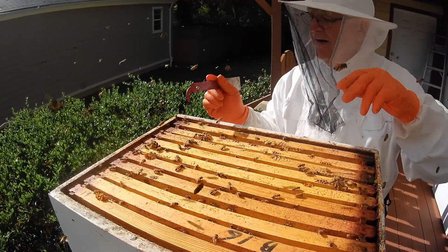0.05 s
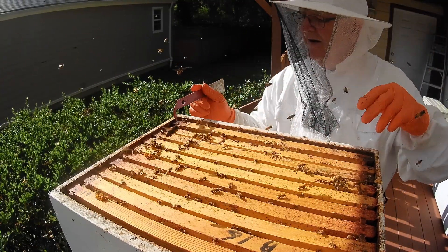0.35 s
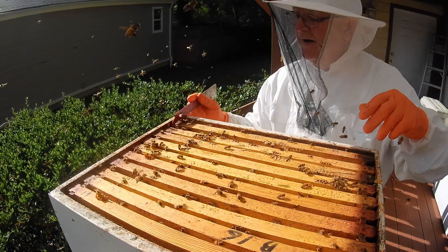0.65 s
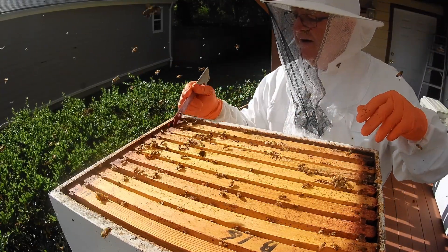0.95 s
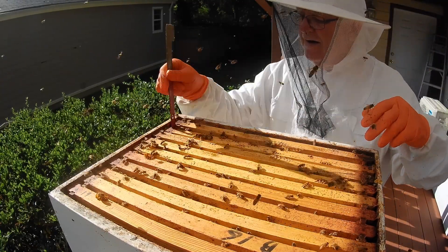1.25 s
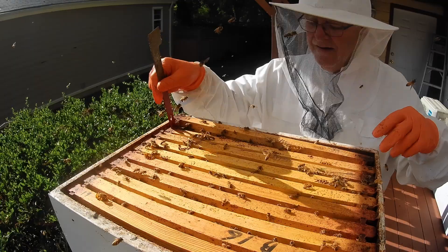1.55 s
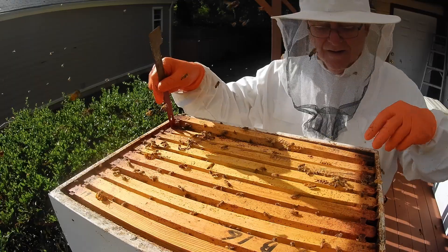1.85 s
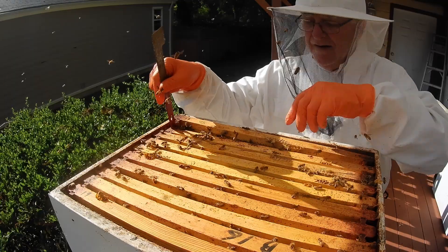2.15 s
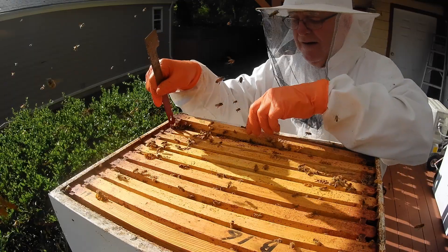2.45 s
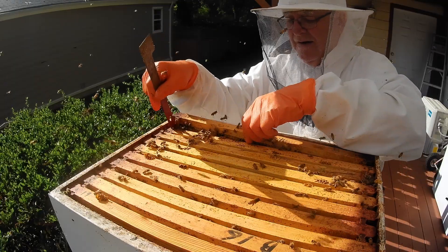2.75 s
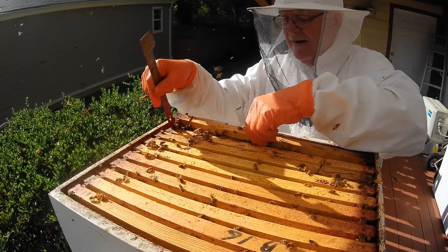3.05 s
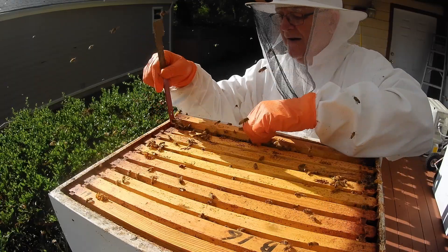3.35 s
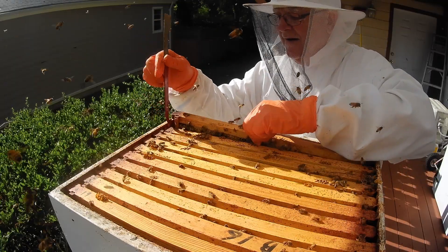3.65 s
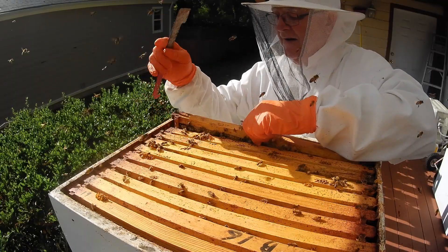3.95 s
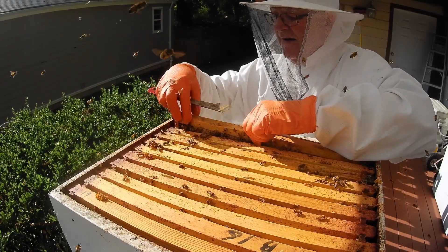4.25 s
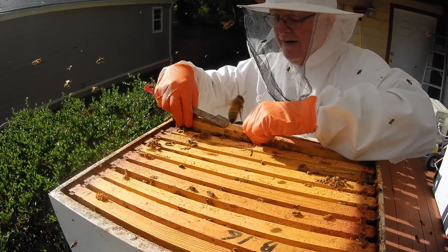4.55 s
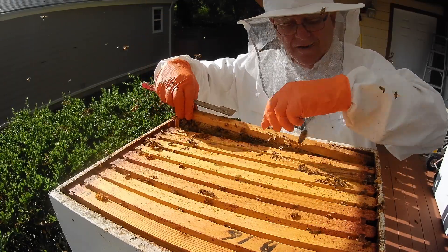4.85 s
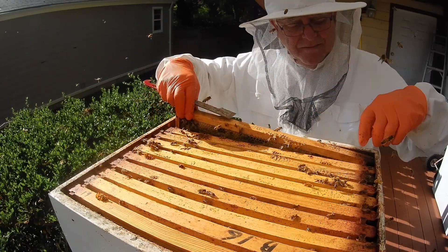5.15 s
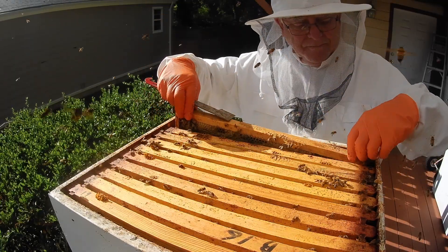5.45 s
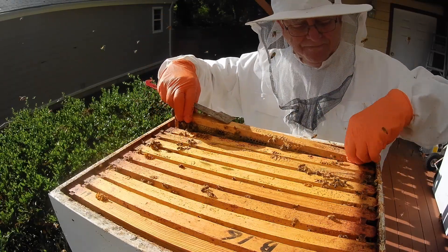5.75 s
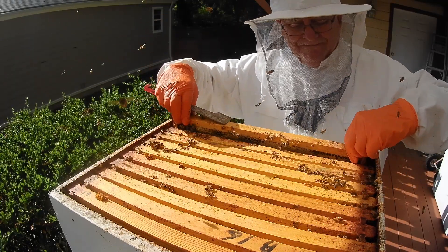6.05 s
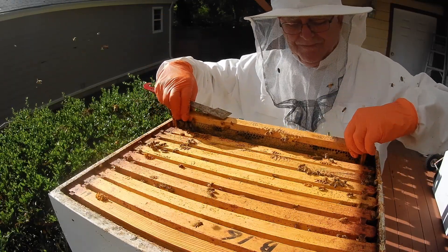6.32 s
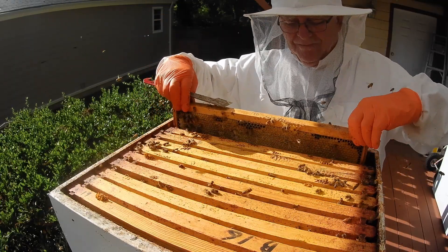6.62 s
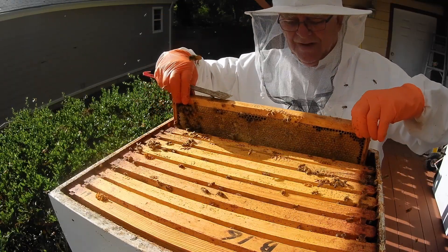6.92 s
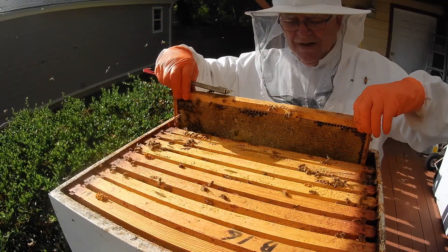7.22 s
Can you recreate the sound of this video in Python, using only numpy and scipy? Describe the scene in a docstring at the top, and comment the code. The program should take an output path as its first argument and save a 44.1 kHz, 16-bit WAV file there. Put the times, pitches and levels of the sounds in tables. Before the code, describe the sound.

Outdoors, close to an open beehive, many bees blend into a continuous wavering hum. Individual bees swoop in with brief whining buzzes, some bumping the microphone with small clicks and dull thuds. The passes pause while a steel tool makes a few quiet scrapes in the wooden box. Then comes the loudest sound, a hard tap of a bee striking the microphone, followed by more fly-bys. A very faint cricket chirps far off.

```python
"""Honey bees at an open hive

Periodic wing strokes give each bee a harmonic hum, and many detuned bees blur into a swarm. Some fly
up to the microphone, fan it with their wings and bump into its case, exciting its modes. A steel hive
tool ticks faintly by friction as a wooden frame is eased out. Far off, a cricket chirps and a machine
drones in the garden air."""
import sys
import numpy as np
from scipy import signal
from scipy.fft import rfft, irfft
from scipy.io import wavfile
from scipy.ndimage import map_coordinates

SR = 44100
rng = np.random.default_rng(int(sys.argv[2]) if len(sys.argv) > 2 else 0)


def wrap_up_sound(samples):
    """Save the sound to the file named by the first command line argument, as 16-bit audio."""
    columns = np.atleast_2d(samples).T
    # keep every value between -1 and 1, then stretch to whole-number steps
    tamed = np.clip(columns, -1, 1)
    steps = np.round(tamed * 32767).astype(np.int16)
    wavfile.write(sys.argv[1], SR, steps)


N = 325458
T = np.arange(N) / SR
FADE_S = .09  # a close bee is heard this long before and after its path


def close_bee(path, facing_db, octave_trim_db, buzz_trim_db, tilt_db, whine_db):
    """Periodic wing strokes radiate harmonics; the near-field fundamental falls fastest with distance."""
    # harmonic envelope of a close wing (frequency [Hz], relative level [dB])
    wing_spectrum = [(800, 2.5), (1100, -3.5), (1600, -6), (2100, -14.5), (2500, -17.5), (3000, -25.5),
                     (4200, -35), (6000, -50.5), (8600, -43.5), (11000, -73)]
    # air torn by the wing (frequency [Hz], relative spectral density [dB])
    rasp_spectrum = [(400, -10), (900, 15), (1600, 18), (2300, 5), (3800, -2), (5200, -8), (6300, -28),
                     (9000, -33.5), (11000, -47.5)]
    # brief pulsing hisses, the last around the loudest click (time [s], half width [s], level [dB])
    hisses = [(0.48, 0.017, -60), (0.595, 0.013, -65), (1.301, 0.0027, -66), (1.318, 0.026, -64),
              (2.426, 0.0078, -48), (2.448, 0.0078, -58), (2.5057, 0.0012, -41), (5.991, 0.016, -46.5)]
    # colour of that hiss (frequency [Hz], relative spectral density [dB])
    hiss_spectrum = [(1000, -4.5), (2400, 0), (4400, 2), (6000, -4), (9200, -5), (10500, -32.5),
                     (15000, -44.5)]
    arrive_db_per_s, leave_db_per_s, usual_db = 342.5, 315, -36
    jitter, whine_width_hz, rough_hz = .005, 170, 2500
    s, path_hz, path_db, path_whine_hz = np.transpose(path)
    near = (T > s[0] - FADE_S) & (T < s[-1] + FADE_S)
    t = T[near]
    away_db = arrive_db_per_s * np.maximum(s[0] - t, 0) + leave_db_per_s * np.maximum(t - s[-1], 0)
    closer_db = np.interp(t, s, path_db) - away_db - usual_db
    hz, whine_hz = np.interp(t, s, path_hz), np.interp(t, s, path_whine_hz)
    phase = 2 * np.pi * np.cumsum(hz * (1 + jitter * walk(108, t))) / SR
    # the balance of the first two harmonics shows which way the bee faces
    fundamental_db = usual_db + closer_db + facing_db
    octave_db = -38 + .76 * closer_db + octave_trim_db + 3 * walk(36.7, t)
    buzz_db = -42.5 + .72 * closer_db + buzz_trim_db
    octave = undb(octave_db) * np.cos(2 * phase + rng.normal(0, 1))
    hum = np.sqrt(2) * (undb(fundamental_db) * np.cos(phase) + octave)
    buzz = 0
    for k in range(3, 36):
        turning_db = 3 * walk(25.5, t) + 2.2 * walk(170, t)  # slow turns and fast flutter
        # the band beamed at the microphone moves as the bee banks
        beam_db = whine_db * np.exp(-.5 * ((k * hz - whine_hz) / whine_width_hz) ** 2)
        gain = gain_at(k * hz, wing_spectrum) * undb(turning_db + beam_db + tilt_db * np.log2(k))
        smear = (k * hz.mean() / rough_hz) ** 2 * walk(130, t)  # unequal strokes blur high harmonics
        buzz = buzz + gain * np.cos(k * phase + smear + rng.normal(0, 1))
    flicks = rng.standard_normal(len(t)) * np.cos(phase / 2) ** 6  # one noise burst a stroke
    buzz = unit(buzz) + undb(-11) * unit(colour(flicks, rasp_spectrum))
    hiss = unit(colour(flicks, hiss_spectrum)) * swells(hisses)[near]
    stroke_gain = undb(.7 * walk(200.2, t))
    return (hum + undb(buzz_db) * buzz + hiss) * stroke_gain * signal.windows.tukey(len(t), .1)


def fly_bys():
    """Directivity: each bee that comes close has its own tone, set by the way it faces."""
    # one path a flight (time [s], wingbeat [Hz], nearness as a level [dB], whine centre [Hz])
    paths = [
        [(.418, 258.3, -45.5, 1050), (.438, 273.5, -38, 1600), (.472, 250, -39, 900),
         (.506, 261.4, -36.5, 1250), (.542, 250.4, -43.5, 1400), (.576, 263.8, -36, 1580),
         (.62, 272, -36, 1500), (.642, 282.3, -44, 1670), (.66, 291.2, -30, 1290), (.674, 304, -42, 1520),
         (.70, 301, -34.5, 1400), (.72, 271, -48.5, 900)],
        [(1.23, 258.5, -48, 1300), (1.262, 259.2, -39.5, 800), (1.294, 256.3, -24.5, 780),
         (1.318, 275, -26, 810), (1.346, 262.8, -32.5, 850), (1.374, 286.6, -22.5, 1330),
         (1.394, 283.4, -25.5, 1120), (1.424, 258, -29.5, 1060), (1.462, 270, -40, 880)],
        [(2.12, 244.3, -42.5, 1200), (2.158, 232.7, -35.5, 1150), (2.205, 241, -47, 1220)],
        [(2.225, 272.4, -54.5, 1390), (2.254, 292.6, -47.5, 1460), (2.295, 289, -57, 1200),
         (2.335, 297.6, -43, 1780), (2.37, 303, -49.5, 1190), (2.41, 308.8, -36, 920),
         (2.462, 268.4, -41, 1320), (2.494, 272, -45, 1340), (2.508, 274, -33, 820), (2.542, 256, -38.5, 1050),
         (2.574, 289.1, -34.5, 1150), (2.614, 248.5, -28.5, 1240), (2.64, 261.5, -35, 1590),
         (2.68, 289, -28, 1110), (2.712, 267, -30, 1050), (2.74, 277.5, -42, 840)],
        [(5.97, 264.5, -48, 1315), (5.995, 248, -38, 1200), (6.013, 225.6, -40, 730), (6.05, 262, -37.5, 1600),
         (6.085, 274.4, -40, 1394)],
        [(6.125, 235.2, -43, 1200), (6.15, 251.5, -36.5, 1520)],
        [(6.535, 270.2, -49, 1400), (6.574, 272.7, -44, 1410), (6.594, 292.4, -39.5, 1300),
         (6.626, 275, -36.5, 1200), (6.69, 277, -45.5, 820)],
        [(7.01, 249.4, -66, 1005), (7.085, 256.2, -41, 1040), (7.13, 249.2, -54, 1246),
         (7.175, 251.7, -53, 995), (7.26, 258.3, -50, 1300)],
    ]
    # tone offsets a flight (fundamental [dB], octave [dB], buzz [dB], tilt [dB/octave], whine [dB])
    tones = [(1.5, -2.5, 2.5, 2.5, 4.5), (1, -2, 1, 1.5, 6), (-20, -2, -3.5, 4, 14),
             (2.5, 1.5, -.5, 1.5, 9), (0, 0.5, 1, -2, 4), (-25, -3.5, -5, 4, 4), (1, -2, -1.5, 0.5, 8),
             (1, -10, -1.5, 6, 10)]
    out = np.zeros(N)
    for path, tone in zip(paths, tones):
        add(out, path[0][0] - FADE_S, close_bee(path, *tone))
    return out


def head_clicks(rebound_s=.00041, rebound_gain=.13):
    """Hard impacts excite the case's modes according to the place struck; a glancing blow is duller."""
    # modes of the case (frequency [Hz], t60 [s], weight at the face [dB], weight at the rim [dB])
    case_modes = [(1700, 0.0071, 1.5, -37), (2500, 0.0046, -1.5, 12.5), (2990, 0.011, -0.5, -14),
                  (3460, 0.0033, 4, -24), (4070, 0.012, 0, -17), (4400, 0.008, -12, 11.5),
                  (5150, 0.0039, -2.5, -6.5), (6700, 0.0054, -22.5, 11), (8500, 0.003, -13.5, 2),
                  (9600, 0.0018, -16.5, -13), (12100, 0.002, -9.5, -28), (13400, 0.0024, -15.5, -15)]
    # bees hit head first (time [s], peak level [dB], place [0 face to 1 rim], cutoff [Hz])
    impacts = [(0.4302, -17, 0.5, 12000), (0.662, -37, 0.2, 3200), (0.682, -32.5, 0.15, 4050),
               (1.298, -43, .1, 3480), (2.426, -35, 0.28, 9500), (2.5075, -35, 0.3, 10000),
               (5.9853, 1, 0.06, 18000), (5.987, -18, .1, 5000), (5.995, -35, .2, 15000),
               (6.137, -38, .05, 2100), (7.103, -34.5, .3, 9000)]
    out = np.zeros(N)
    hz, t60, face_db, rim_db = np.transpose(case_modes)
    for s, db, place, cutoff_hz in impacts:
        click = ring(hz, t60, face_db + place * (rim_db - face_db))
        t = T[:len(click)]
        second_contact = rebound_gain * np.interp(t - rebound_s, t, click)
        click = lowpass(click + second_contact, cutoff_hz, order=3)
        add(out, s, undb(db) * click / np.abs(click).max())
    return out


def body_thuds(squash_s=.00036):
    """Soft impacts: a bee's body pushes in gradually and sounds the low, hollow modes of the case."""
    # hollow modes of the case (frequency [Hz], t60 [s], relative level [dB])
    hollow_modes = [(373, 0.022, -3), (548, 0.041, -7.5), (762, 0.03, 1), (1410, .012, -49.5)]
    # soft blows (time [s], gain [dB], cutoff [Hz])
    blows = [(.6818, -13.5, 1200), (.690, -19, 500.7), (1.297, -25.5, 700), (2.507, -19.5, 419.2),
             (5.9856, -16.5, 1100), (6.137, -31.5, 1400)]
    out = np.zeros(N)
    contact = 1 - np.exp(-T[:SR // 8] / squash_s)
    thud = contact * ring(*np.transpose(hollow_modes))
    for s, db, cutoff_hz in blows:
        add(out, s, undb(db) * lowpass(thud, cutoff_hz, order=2))
    return out


def wing_wash():
    """Air displaced by a passing bee gives a pressure pulse flanked by suction, and dull turbulence."""
    # pulses over the microphone's port (time [s], half width [s], peak level [dB])
    pulses = [(1.4, 0.001, -19), (1.418, 0.0058, -19.5), (2.704, 0.00072, -17.5), (2.729, 0.0075, -20),
              (6.658, .0034, -39)]
    # turbulent puffs on the microphone (time [s], half width [s], level [dB], cutoff [Hz])
    puffs = [(0.73, 0.026, -51, 220), (1.411, 0.016, -28.5, 122), (2.527, 0.017, -46, 200),
             (2.72, 0.014, -24.5, 140), (2.721, 0.011, -28.5, 800), (6.66, 0.022, -53, 108.4)]
    out = sum(undb(db) * (1 - ((T - s) / half) ** 2) * bell(s, half) for s, half, db in pulses)
    for s, half, db, cutoff_hz in puffs:
        envelope = bell(s, half)
        band = signal.butter(3, [25, cutoff_hz], "band", fs=SR, output="sos")
        gust = envelope * signal.sosfilt(band, rng.standard_normal(N))
        out += undb(db) * gust * np.sqrt(np.sum(envelope ** 2) / np.sum(gust ** 2))
    return out


def swarm(count, mean_hz, spread_hz, wander, waver, distance_db):
    """Incoherent summation of bees, each with its own wandering wingbeat and changing distance."""
    # harmonic envelope of a bee round the hive (frequency [Hz], relative level [dB])
    bee_spectrum = [(190, -8.5), (260, -3), (400, 1), (520, 0.5), (650, -11), (1000, -7.5), (1600, -8),
                    (2100, -21), (3500, -27), (6000, -47.5)]
    # loudness contour of the swarm before mixing (time [s], level [dB])
    contour = [(0, -45.5), (3.6, -45), (4.2, -46.5), (6.4, -46), (7.38, -44.5)]
    out, size = 0, 2048
    k = np.arange(1, 31)
    for hz in mean_hz + spread_hz * np.linspace(-1, 1, count):
        harmonics = gain_at(k * hz, bee_spectrum) * np.exp(2j * np.pi * rng.random(len(k)))
        stroke = irfft(np.r_[0, harmonics], size)  # one period of the wingbeat
        cycles = np.cumsum(hz * (1 + wander * walk(6) + waver * walk(28))) / SR
        out = out + stroke[(cycles * size).astype(int) % size] * undb(distance_db * walk(7))
    return unit(out) * undb(np.interp(T, *np.transpose(contour)))


def hive_hum():
    """Masking: three nearer hovering bees emerge from the blurred hum of the crowd and sink back."""
    hovering = swarm(count=3, mean_hz=243, spread_hz=24, wander=.04, waver=.013, distance_db=6)
    crowd = swarm(count=24, mean_hz=233, spread_hz=33, wander=.05, waver=.024, distance_db=4)
    return undb(-1) * crowd + undb(-8) * hovering


def hive_work(grit_db=5, spot_width_hz=700, spot_db=9):
    """Friction drives resonances: the tool slips in bursts dulled by wax, and the frame rumbles."""
    # tool slips (time [s], peak level [dB], t60 [s], cutoff [Hz], resonance of the spot touched [Hz])
    scrapes = [(3.655, -45.5, .044, 6000, 2600), (4.062, -48, 0.099, 8500, 3830),
               (4.363, -38, .05, 1600, 800), (4.811, -50, .01, 5600, 3200),
               (4.823, -48.5, 0.011, 5970, 4970), (5.04, -47.5, 0.16, 9000, 5150),
               (5.0487, -33, 0.0136, 5070, 2500), (5.052, -42, 0.14, 4500, 2900),
               (7.1022, -34.5, 0.025, 2430, 1300)]
    # resonances of the tool on the wood (frequency [Hz], bandwidth [Hz], relative gain [dB])
    tool_modes = [(1600, 600, -4), (2640, 590, 4), (3860, 580, -3), (4930, 320, -6), (8500, 1500, 1)]
    # the frame shifts in its box (time [s], half width [s], level [dB])
    shifts = [(1.082, 0.036, -55), (3.666, 0.029, -51), (4.367, 0.014, -50.5), (6.393, 0.026, -47),
              (6.466, 0.039, -47.5)]
    # resonances of the wooden box (frequency [Hz], bandwidth [Hz], relative gain [dB])
    box_modes = [(105, 49, -3.5), (159, 120, -7), (280, 86, -5.5)]
    out, t = np.zeros(N), T[:SR // 4]
    for s, db, t60, cutoff_hz, spot_hz in scrapes:
        grit = rng.standard_normal(len(t)) * undb(grit_db * rng.standard_normal(len(t)))
        slip = resonate(grit * undb(-60 * t / t60), tool_modes + [(spot_hz, spot_width_hz, spot_db)])
        slip = lowpass(slip, cutoff_hz, order=8)
        add(out, s, undb(db) * slip / np.abs(slip).max())
    rub = lowpass(rng.standard_normal(N), 900, order=2)
    return out + unit(resonate(rub, box_modes)) * swells(shifts)


def cricket(pitch_hz=8620, width_hz=440, skirt_width_hz=1800, chirps_per_s=14, steady=.4):
    """Stridulation as resonant noise: a thin, unevenly pulsing rasp that grows fainter midway."""
    rasp = rng.standard_normal(N)
    for _ in range(2):
        rasp = resonate(rasp, [(pitch_hz, width_hz, 0), (pitch_hz, skirt_width_hz, -9)])
    cycles = np.cumsum(chirps_per_s * (1 + .25 * walk(12))) / SR
    strokes = np.sin(np.pi * cycles) ** 6 * undb(2.5 * walk(12))
    level_db = np.interp(T, [3.5, 4.6], [-79.5, -86])
    return unit(rasp * (steady + strokes)) * undb(level_db)


def garden(air_db=-53, stir_db=-.8, drone_hz=105, drone_db=-67):
    """Ambient noise: gently stirring broadband air and the wavering low tone of a distant machine."""
    # garden air (frequency [Hz], relative spectral density [dB])
    air_spectrum = [(20, -1), (50, -0.5), (85, -5), (150, -6.5), (330, -5), (800, -3), (1600, -19.5),
                    (2100, -21.5), (4000, -24), (5300, -30.5), (6100, -43), (7000, -38.5), (9000, -39),
                    (10500, -46.5), (15000, -51.5)]
    air = colour(rng.standard_normal(N), air_spectrum)
    phase = 2 * np.pi * np.cumsum(drone_hz * (1 + .013 * walk(31))) / SR
    drone = np.sin(phase) * undb(2.4 * walk(5.8))
    return unit(air) * undb(air_db + stir_db * walk(2.985)) + unit(drone) * undb(drone_db)


def undb(db):
    """Decibels to amplitude ratio."""
    return 10 ** (np.asarray(db) / 20)


def unit(x):
    """Normalise to rms 1."""
    return x / np.sqrt(np.mean(x ** 2))


def gain_at(hz, points):
    """Gain of a (frequency [Hz], level [dB]) spectrum, interpolated in log frequency."""
    f, db = np.transpose(points)
    return undb(np.interp(np.log(np.maximum(hz, 1)), np.log(f), db))


def colour(x, points):
    """Filter x by a (frequency [Hz], gain [dB]) response."""
    return irfft(rfft(x) * gain_at(np.fft.rfftfreq(len(x), 1 / SR), points), len(x))


def lowpass(x, cutoff_hz, order):
    """Maximally flat low-pass filter."""
    return signal.sosfilt(signal.butter(order, cutoff_hz, fs=SR, output="sos"), x)


def walk(rate, t=T):
    """Smooth random modulation of spread about 1, taking rate new values a second."""
    knots = rng.standard_normal(1024)
    grid = np.linspace(t[0], t[-1], len(t) // 64)
    return np.interp(t, grid, map_coordinates(knots, [(grid - t[0]) * rate], order=3, mode="wrap"))


def resonate(x, peaks):
    """Parallel resonators (frequency [Hz], bandwidth [Hz], gain [dB]) driven by x."""
    return sum(undb(db) * signal.lfilter(*signal.iirpeak(hz, hz / width, fs=SR), x)
               for hz, width, db in peaks)


def ring(hz, t60, db):
    """Impulse response of damped modes of alternating sign, peak 1."""
    t = T[:SR // 8, None]
    modes = np.sin(2 * np.pi * hz * t) * undb(db - 60 * t / t60)
    y = modes @ (-1.) ** np.arange(len(hz))
    return y / np.abs(y).max()


def bell(s, half):
    """Gaussian envelope round time s; the half width is its standard deviation."""
    return np.exp(-.5 * ((T - s) / half) ** 2)


def swells(events):
    """Sum of Gaussian envelopes (time [s], half width [s], level [dB])."""
    return sum(undb(db) * bell(s, half) for s, half, db in events)


def add(out, s, x):
    """Mix x into out from time s."""
    i = int(s * SR)
    out[i:i + len(x)] += x[:N - i]


def scene():
    """Superposition of all sources at one microphone in the open air."""
    out = hive_hum() + garden() + cricket() + hive_work()
    out += head_clicks() + body_thuds() + wing_wash() + fly_bys()
    return out[None]


def record(dry, ceiling=.78, knee=6, top_hz=15800):
    """Soft saturation rounds off the loudest click, and a steep low-pass cuts the top."""
    clipped = dry / (1 + np.abs(dry / ceiling) ** knee) ** (1 / knee)
    return signal.sosfilt(signal.ellip(8, .2, 70, top_hz, fs=SR, output="sos"), clipped)


dry = scene()
out = record(dry)
wrap_up_sound(out)
```